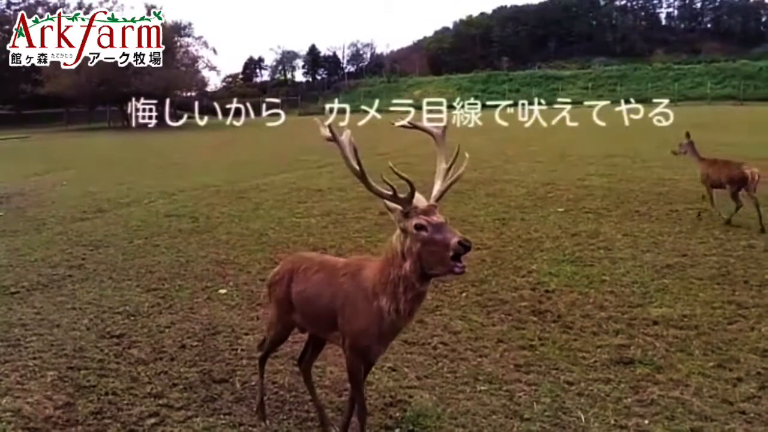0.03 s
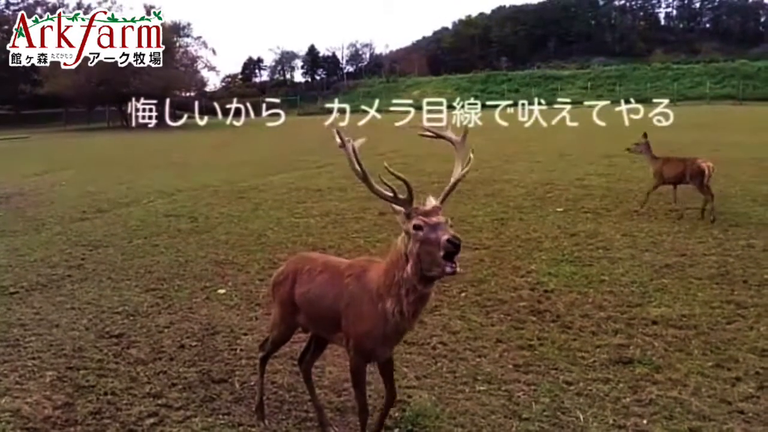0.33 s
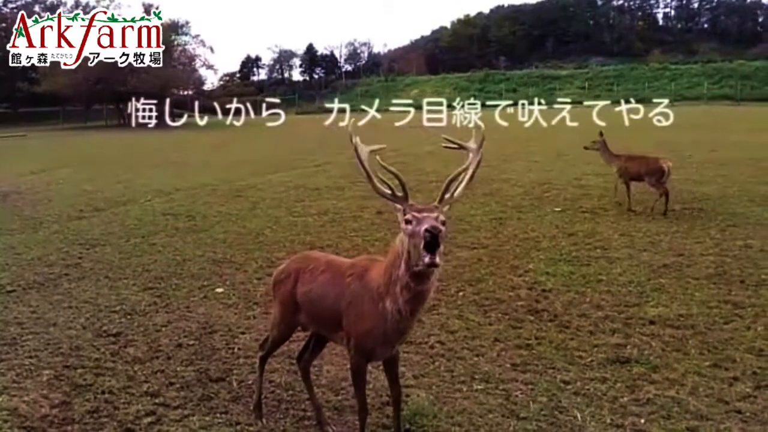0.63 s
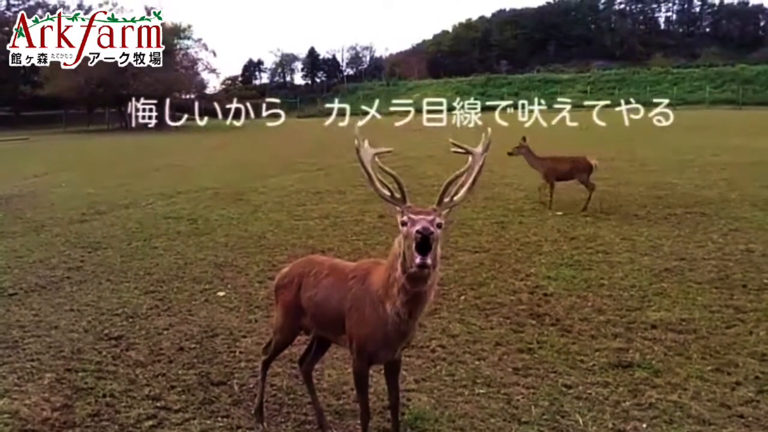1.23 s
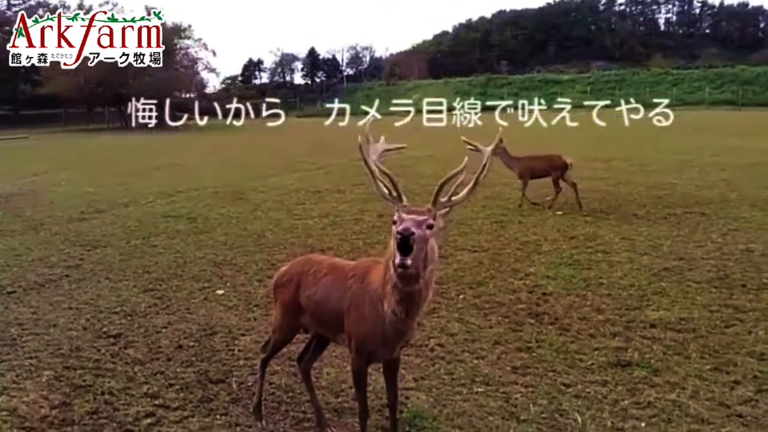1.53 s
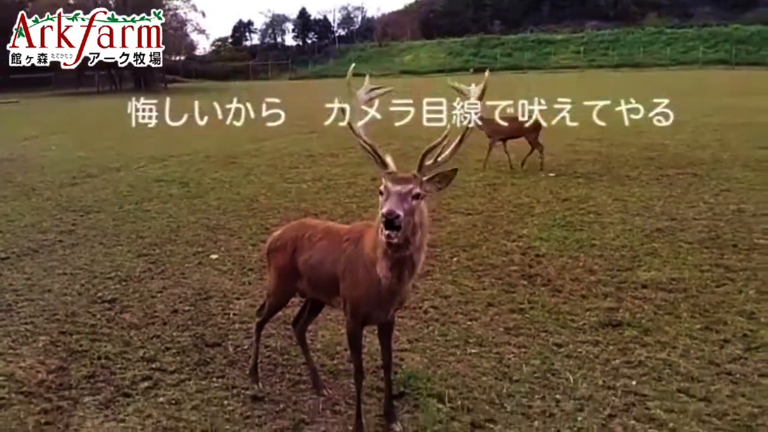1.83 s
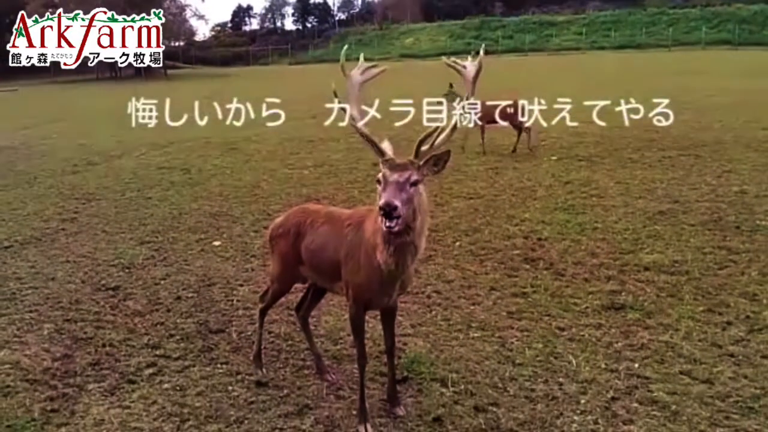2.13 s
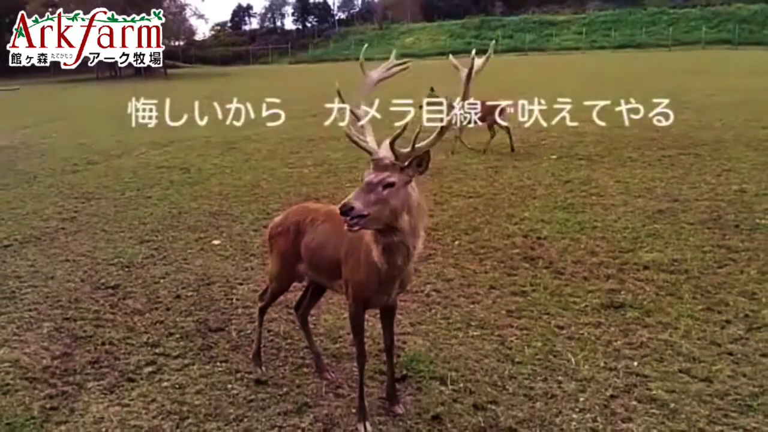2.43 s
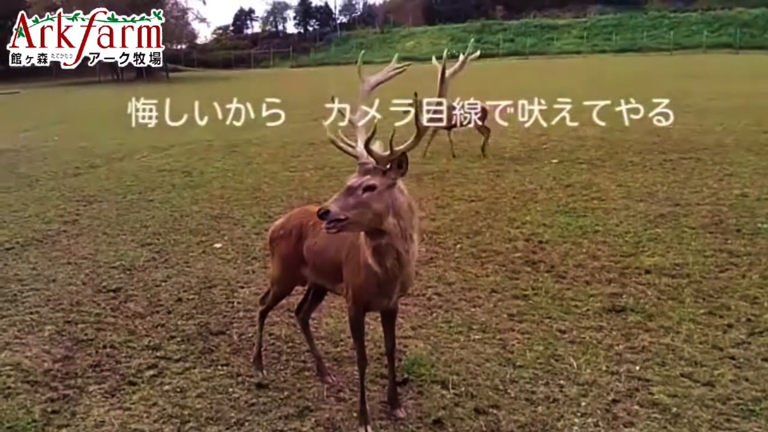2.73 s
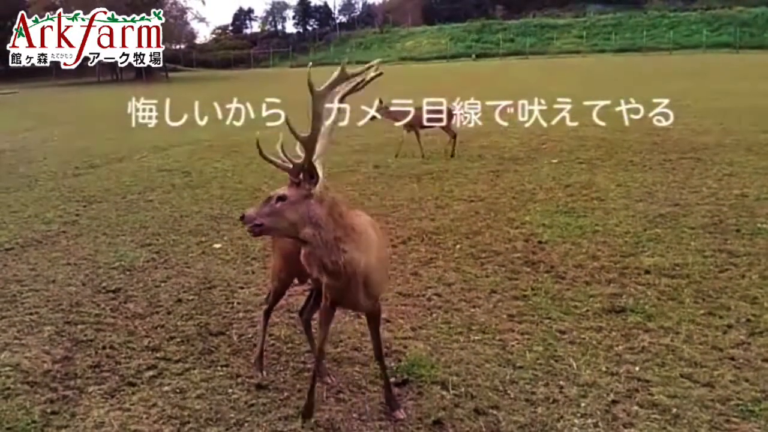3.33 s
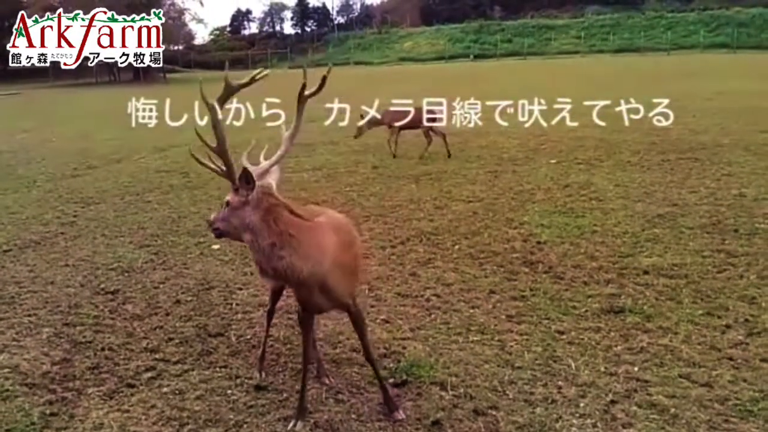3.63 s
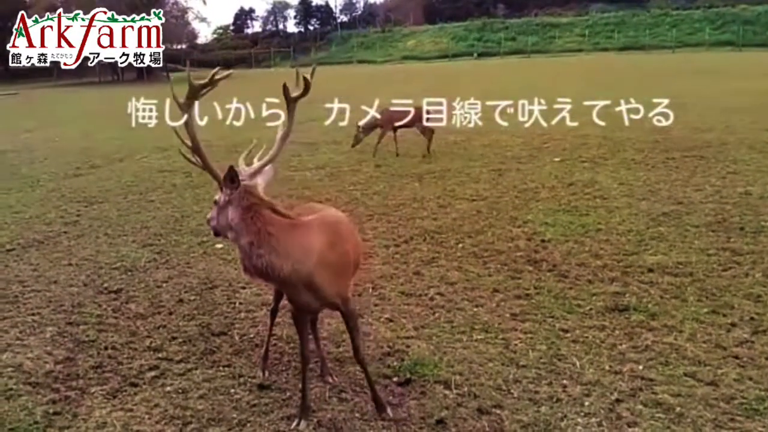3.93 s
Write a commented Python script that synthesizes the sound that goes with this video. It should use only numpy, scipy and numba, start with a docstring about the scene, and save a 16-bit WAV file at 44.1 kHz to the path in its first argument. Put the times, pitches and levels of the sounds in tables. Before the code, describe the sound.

A stag roars once, harsh and low, then puffs softly through his muzzle.

```python
"""A red deer stag roars once, close by, on an open pasture: harsh pulses from his vocal folds ring
through a long throat, sink in pitch and end in a few slack flaps.
He then blows air through his muzzle a few times, with thin nostril whistles, small wet mouth clicks
and one soft gulp. Throughout, wind rumbles on the microphone and insects sing faintly in the grass."""
import sys
import numpy as np
from scipy import signal
from scipy.fft import rfft, irfft
from scipy.io import wavfile
from scipy.ndimage import uniform_filter1d
from numba import njit

SR = 44100
rng = np.random.default_rng(int(sys.argv[2]) if len(sys.argv) > 2 else 0)


def generate_wav(sig):
    """Save sig (samples, or channels by samples) to the path in sys.argv[1] as 16-bit PCM at SR."""
    pcm = np.round(np.clip(np.atleast_2d(sig).T, -1, 1) * 32767).astype(np.int16)
    wavfile.write(sys.argv[1], SR, pcm)


N = 176400
T = np.arange(N) / SR
HZ = np.maximum(np.fft.rfftfreq(N, 1 / SR), 1)

ROAR_END_S, RELEASE_S, SWELL_RAMP_S = 1.628, 0.026, 0.044
# hoots and brighter rasp where the throat rings out: start/s, end/s, f/Hz, width/Hz, boost/dB
ROAR_SWELLS = [(-.05,0.395,1034,118.5,8.5),(0.23,0.637,8300,2407,9),(0.617,0.869,856,46.3,17),(0.41,0.63,498,43,2.5),(1.089,1.203,879,37.04,14),(1.126,1.357,525.6,52.92,12.5),(1.326,1.567,526.6,42.9,9.5),(0.192,1.45,3950,350,8),(1.57,2,934,64.44,2.5),(0.032,0.16,2000,55.56,12),(0.311,0.416,1955,130,8.5),(.44,0.552,3510,110,9)]
def roar():
    """Fold pulses drive the throat, which swells into hoots and rasp before a quick release."""
    voice = balance_registers(throat(vocal_folds()))
    for start, end, hz, width_hz, db in ROAR_SWELLS:
        fade = np.clip(np.minimum(T - start, end - T) / SWELL_RAMP_S, 0, 1)
        voice = bell_eq(voice, hz, width_hz, db * fade)
    return voice * np.exp(-np.maximum(T - ROAR_END_S, 0) / RELEASE_S)


# pitch contour: t/s, f/Hz
FOLD_PITCH = [(0.0, 123.9), (0.086, 120.2), (0.17, 121.1), (0.268, 116.5), (0.49, 122.9), (0.568, 119.1),
              (0.702, 125), (0.772, 126), (0.868, 122.4), (0.994, 112.4), (1.082, 113.8), (1.182, 106.1),
              (1.326, 102.8), (1.52, 105.3), (1.566, 100.7), (1.65, 85.87), (1.66, 86)]
# growl: t/s, roughness (0 is smooth)
FOLD_ROUGHNESS = [(0,0.23),(.3,0.33),(.5,0.44),(.76,0.26),(.92,.35),(1.1,0.2),(1.48,0.3),(1.56,0.36),(1.63,1.06)]
# the clean pulses thin out towards the top: f/Hz, level/dB
PULSE_EQ = [(4000,0),(9000,-10)]
# bursts of air take over there: f/Hz, level/dB
AIR_EQ = [(3300,-12),(6000,0)]
# tone of pulses and air together: f/Hz, level/dB
FOLD_EQ = [(120,-21),(220,1),(350,0),(700,-11.5),(1100,-2.5),(1800,2.5),(2300,-4),(3300,5.5),(4400,-21),(7000,-21.5),(10500,-23),(13000,-34)]
def vocal_folds(jitter=.02, shimmer=.28, air_db=-4, burst_cycles=.4):
    """Sharp pulses, each with a rasping burst of air; roughness unsteadies their pitch and level."""
    (pitch,), (rough,) = curves(FOLD_PITCH), curves(FOLD_ROUGHNESS)
    cycles = np.cumsum(pitch * (1 + jitter * rough ** 2 * noise_band(0, width_hz=230))) / SR
    pulses, voiced = np.zeros(N), T < ROAR_END_S + .1
    angle = 2 * np.pi * cycles[voiced]
    phases = rng.standard_normal(75)  # one per harmonic
    pulses[voiced] = sum(np.cos(k * angle + phase) for k, phase in enumerate(phases, 1))
    pulses = equalise(pulses, PULSE_EQ) * np.sqrt(voiced.mean())
    bursts = unit_rms(np.exp(-(cycles % 1) / burst_cycles))
    air = from_db(air_db) * np.sqrt(rough) * shaped_noise(AIR_EQ) * bursts
    flutter = 1 + shimmer * rough * noise_band(0, width_hz=120)
    return equalise((pulses + air) * flutter, FOLD_EQ)


# two low formants that move with neck and jaw: t/s, first f/Hz, second f/Hz
LOW_FORMANTS = [(0,595,1024),(.45,505,930),(.8,508,900),(1.0,479,905.6),(1.25,502.2,930),(1.66,507,905)]
# their shapes, a row each: width/Hz, boost/dB
LOW_FORMANT_SHAPES = [(45,22.5),(45,15.5)]
# upper formants and notches: f/Hz, width/Hz, boost/dB
UPPER_FORMANTS = [(1237,22,11),(1528,29,14.5),(1882,16,17),(2028,32.5,10),(2133,110,-7),(2320,39,11),(2619,41,16),(2780,62,-9),(2903,33,18),(3216,57,20.5),(3428,26,14),(3673,30,14),(3873,46,9),(4120,50,11),(4940,120,9.5),(6150,280,15),(9000,110,12),(10270,190,9.5)]
# the throat shortens as the roar ends: t/s, factor on the upper formant frequencies
THROAT_SHORTENING = [(1.52,1),(1.64,1.04)]
def throat(x, sway_db=4, wander_depth=.011, full_sway_hz=4500):
    """Narrow resonances ring as harmonics slide across them; the high ones sway and wander most."""
    shortening, = curves(THROAT_SHORTENING)
    for hz, (width_hz, db) in zip(curves(LOW_FORMANTS), LOW_FORMANT_SHAPES):
        x = bell_eq(x, hz, width_hz, db)
    for hz, width_hz, db in UPPER_FORMANTS:
        sway, wander = noise_band(0, width_hz=9), noise_band(0, width_hz=9)
        looseness = min(hz / full_sway_hz, 1)
        centre_hz = hz * shortening * (1 + wander_depth * looseness * wander)
        x = bell_eq(x, centre_hz, width_hz, db + sway_db * looseness * sway)
    return x


# crossovers between the roar's five registers: f/Hz
CROSSOVERS = [720,1150,2600,4300]
# levelling window of each register, low to high: t/s
LEVELLING_WINDOWS = [.034,.034,.3,.05,.05]
# body, the three low registers: level/dB
BODY_LEVELS = [-37,-41,-38.5]
# fader rides on the two top registers: t/s, ring level/dB, rasp level/dB
TREBLE_RIDES = [(0.0, -34, -48.5), (0.154, -35, -51.5), (0.254, -31, -42), (0.314, -29, -46),
                (0.328, -37, -43.5), (0.392, -28.5, -42), (0.712, -31.5, -45.5), (1.328, -39.5, -50.5),
                (1.552, -36, -51), (1.64, -45.5, -49.5)]
def balance_registers(x):
    """A multiband leveller holds the body of the roar steady and rides its ring and rasp."""
    highpasses = [1 / (1 + (edge / HZ) ** 24) for edge in CROSSOVERS]
    bandpasses = -np.diff([np.ones_like(HZ), *highpasses, 0 * HZ], axis=0)
    levels = [*BODY_LEVELS, *curves(TREBLE_RIDES)]
    out, spectrum = 0, rfft(x)
    for bandpass, db, window_s in zip(bandpasses, levels, LEVELLING_WINDOWS):
        band = irfft(spectrum * bandpass, N)
        power = uniform_filter1d(band ** 2, size=int(window_s * SR))
        power = uniform_filter1d(power, size=1100)
        out += band / np.sqrt(np.abs(power) + 1e-12) * from_db(db)
    return out


# slack flaps closing the roar: t/s, level/dB
FLAP_HITS = [(1.625,-30.5),(1.637,-29.5),(1.651,-27.5),(1.663,-37.5)]
# low throat modes: f/Hz, relative level/dB, t60/s
THROAT_MODES = [(194.5,-12,0.16),(278,-2,0.028),(426.5,-12,0.046)]
def flaps():
    """The slackening folds knock the low modes of the throat."""
    out = 0
    for start, db in FLAP_HITS:
        age = np.maximum(T - start, 0)
        for hz, mode_db, t60 in THROAT_MODES:
            gain = from_db(db + mode_db - 60 * np.minimum(age / t60, 2)) * (age < 2 * t60)
            out += gain * np.sin(2 * np.pi * hz * age)
    return out


# blows of air: t/s, hiss level/dB, attack/s, decay/s, whistle level/dB, spray level/dB
MUZZLE_PUFFS = [(1.756,-38.5,0.03,0.056,-46,-65),(1.849,-52.5,0.02,0.17,-93,-65),(2.34,-58.5,0.1,0.12,-72,-57),(3.08,-59,0.1,0.15,-69,-69),(3.386,-43.5,0.1,0.091,-64,-69),(3.56,-51,0.04,0.27,-67,-65)]
# tone of the hiss: f/Hz, level/dB
HISS_EQ = [(1000,-28),(2200,-17.5),(3300,-15),(4200,-13),(5100,-2),(6500,-3.5),(8000,-15),(15000,-56)]
# throat resonances in the hiss: f/Hz, width/Hz, boost/dB
HISS_RINGS = [(3270,45,12),(4730,47,9.5),(5483,28,9.5)]
def muzzle_puffs():
    """Blown air hisses and rings lightly in the throat, with a broad whistle below and spray on top."""
    hiss, whistle = shaped_noise(HISS_EQ), noise_band(hz=2855, width_hz=180)
    for hz, width_hz, db in HISS_RINGS:
        hiss = bell_eq(hiss, hz, width_hz, db)
    hiss, spray = unit_rms(hiss), noise_band(hz=7900, width_hz=7000)
    out = 0
    for start, hiss_db, attack, decay, whistle_db, spray_db in MUZZLE_PUFFS:
        breath = from_db(hiss_db) * hiss + from_db(whistle_db) * whistle + from_db(spray_db) * spray
        out += envelope(start, attack, decay) * breath
    return out


# short whistles: t/s, level/dB, f/Hz
NOSTRIL_WHISTLES = [(1.785,-41,5000),(3.485,-44.5,5700),(3.66,-43.5,4670),(2.44,-60,2800)]
def nostril_whistles():
    """Air squeezed through the nostrils gives thin, breathy tones."""
    return sum(from_db(db) * envelope(start, 0.0095, 0.048) * noise_band(hz, width_hz=37)
               for start, db, hz in NOSTRIL_WHISTLES)


# a soft gulp: t/s, level/dB
MOUTH_GULP = [(1.98,-51)]
# wet clicks: t/s, peak level/dB, f/Hz
MOUTH_CLICKS = [(1.653,-36.5,7860),(1.7974,-34,5100),(1.941,-45,9000),(1.955,-27,7100),(1.977,-33.5,5640),(2.154,-36.5,7800),(2.2433,-34,8200),(2.575,-43,9000),(3.177,-36,7000),(3.309,-44,8100),(3.735,-46,10500),(3.9113,-40,9400),(3.9697,-34.5,6400)]
def mouth(click_width_hz=2530):
    """The wet mouth makes one dull gulp and tiny bright snaps."""
    out = sum(from_db(db) * envelope(start, 0.0098, 0.011) * noise_band(hz=1170, width_hz=2400)
              for start, db in MOUTH_GULP)
    for start, db, hz in MOUTH_CLICKS:
        burst = rng.standard_normal(N) * envelope(start, attack_s=0.00028, decay_s=0.0012)
        snap = irfft(rfft(burst) / (1 + ((HZ - hz) / click_width_hz) ** 4), N)
        out += from_db(db) * snap / np.abs(snap).max()
    return out


def echo(x, wet_db=-15, t60_s=0.3, cutoff_hz=3300):
    """The ground and surroundings scatter back a weak, dull tail."""
    tail = rng.standard_normal(N) * envelope(0.0036, 0.0014, t60_s / np.log(1000))
    tail = signal.sosfilt(signal.butter(1, cutoff_hz, fs=SR, output="sos"), tail[:SR])
    return from_db(wet_db) * signal.fftconvolve(x, tail / np.sqrt(np.sum(tail ** 2)))[:N]


# gusts and lulls: t/s, level/dB
WIND_GUSTS = [(0,-52),(.38,-48),(.49,-38),(.56,-47),(.61,-35.5),(.66,-49.5),(1.62,-47.5),(1.76,-54),(2.0,-53),(2.7,-52),(3.0,-57),(3.85,-55),(3.97,-52)]
# tone of the rumble: f/Hz, level/dB
WIND_EQ = [(12,-2),(30,-1),(55,-8.5),(100,-16.5),(200,-27),(500,-41)]
def wind():
    """Gusts buffet the microphone with a low rumble."""
    gust_db, = curves(WIND_GUSTS)
    return from_db(gust_db) * shaped_noise(WIND_EQ)


# tone of the open air: f/Hz, level/dB
PASTURE_EQ = [(88,-11),(200,-3),(2400,-12),(5650,-8.5),(8010,-9.5),(12000,-20),(15500,-50)]
def pasture(level_db=-59.5):
    """A faint, steady bed of open-air hiss."""
    return from_db(level_db) * shaped_noise(PASTURE_EQ)


def insects(width_hz=54):
    """Insects in the grass sing in two thin, high bands."""
    return from_db(-71.5) * noise_band(4764, width_hz) + from_db(-72) * noise_band(5486, width_hz)


def from_db(db):
    """Decibels to gain."""
    return 10 ** (np.asarray(db) / 20)


def unit_rms(x):
    """Scale to unit power."""
    return x / np.sqrt(np.mean(x ** 2) + 1e-20)


def curves(rows):
    """One automation curve for each column after t/s."""
    times, *columns = np.transpose(rows)
    return [np.interp(T, times, column) for column in columns]


def equalise(x, eq):
    """Shape a sound by a table of f/Hz, level/dB; unit power."""
    hz, db = np.transpose(eq)
    gain = from_db(np.interp(np.log(HZ), np.log(hz), db))
    return unit_rms(irfft(rfft(x) * gain, N))


def shaped_noise(eq):
    """White noise through an EQ curve; unit power."""
    return equalise(rng.standard_normal(N), eq)


def noise_band(hz, width_hz):
    """Noise around a centre, or a random wobble when centred on 0 Hz; unit power."""
    return unit_rms(irfft(rfft(rng.standard_normal(N)) / (1 + (2 * (HZ - hz) / width_hz) ** 2), N))


def envelope(start_s, attack_s, decay_s):
    """Straight rise, exponential fall."""
    return np.clip((T - start_s) / attack_s, 0, 1) * np.exp(-np.maximum(T - start_s - attack_s, 0) / decay_s)


@njit
def resonate(x, angle, radius):
    """A sweepable resonator with unity gain at its peak."""
    y = np.zeros(len(x))
    for i in range(2, len(x)):
        drive = (1 - radius ** 2) / 2 * (x[i] - x[i - 2])
        y[i] = drive + 2 * radius * np.cos(angle[i]) * y[i - 1] - radius ** 2 * y[i - 2]
    return y


def bell_eq(x, hz, width_hz, db):
    """Boost or cut around one resonance."""
    ring = resonate(x, 2 * np.pi * hz / SR * np.ones(N), np.exp(-np.pi * width_hz / SR))
    return x + (from_db(db) - 1) * ring


def scene():
    """The stag and his echo over the pasture ambience, in mono."""
    stag = roar() + flaps() + muzzle_puffs() + nostril_whistles() + mouth()
    return (stag + echo(stag) + insects() + pasture() + wind())[None]


def record(dry):
    """A steep low-pass takes off the very top."""
    cutoff_hz = 15850
    return signal.sosfilt(signal.ellip(12, .1, 80, cutoff_hz, fs=SR, output="sos"), dry)


dry = scene()
out = record(dry)
generate_wav(out)
```